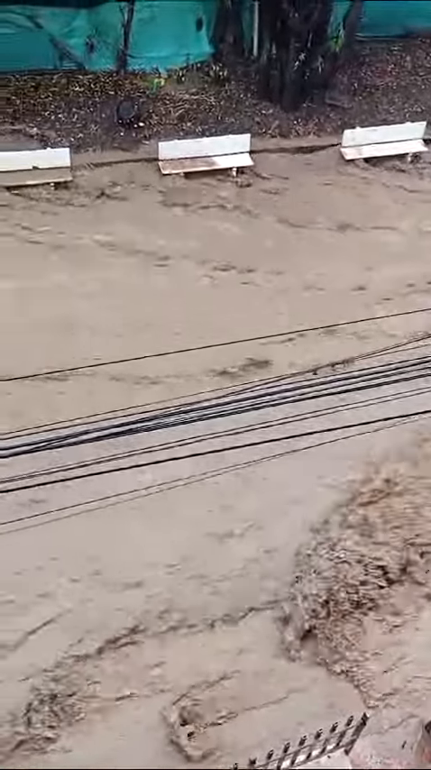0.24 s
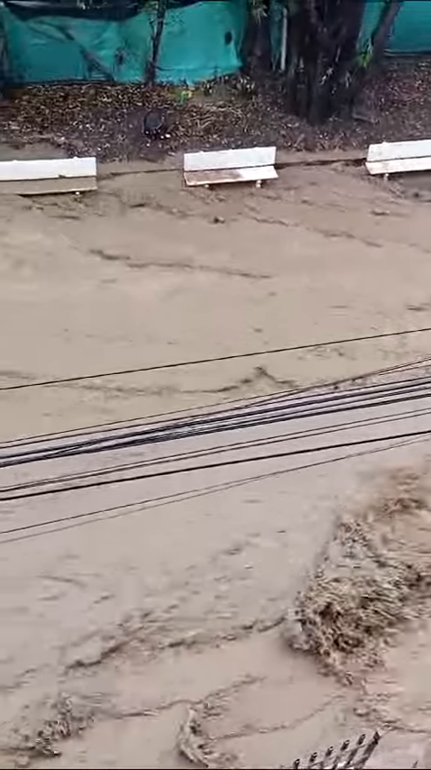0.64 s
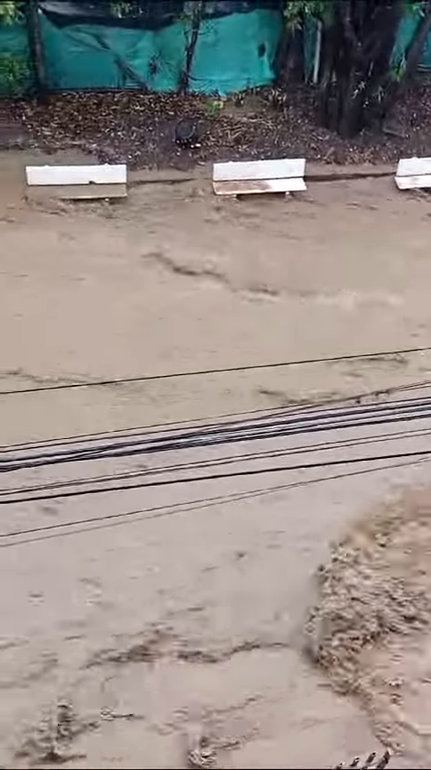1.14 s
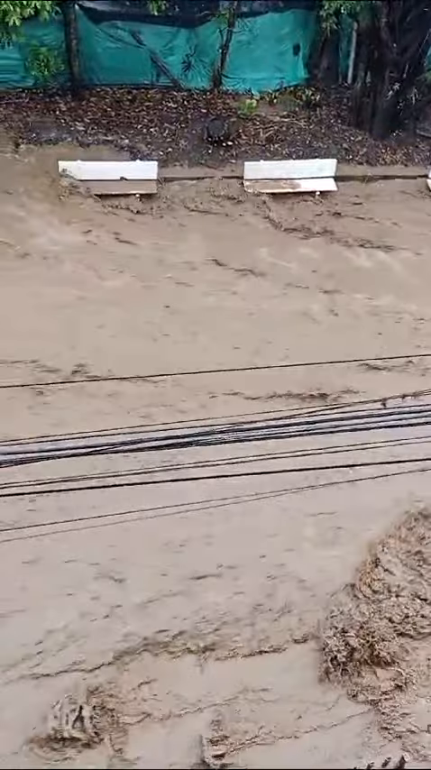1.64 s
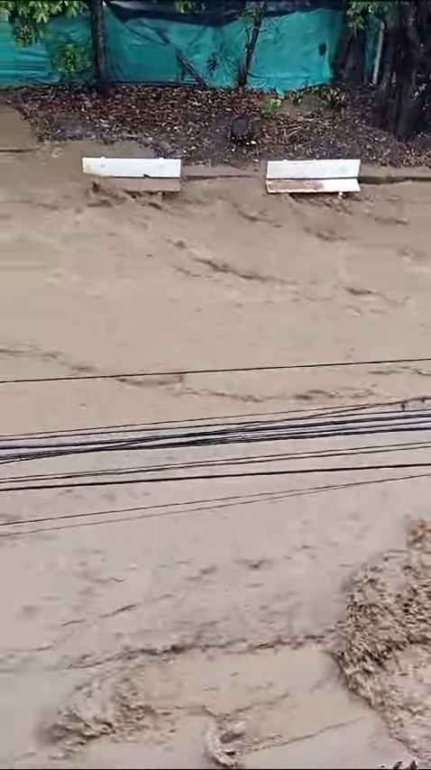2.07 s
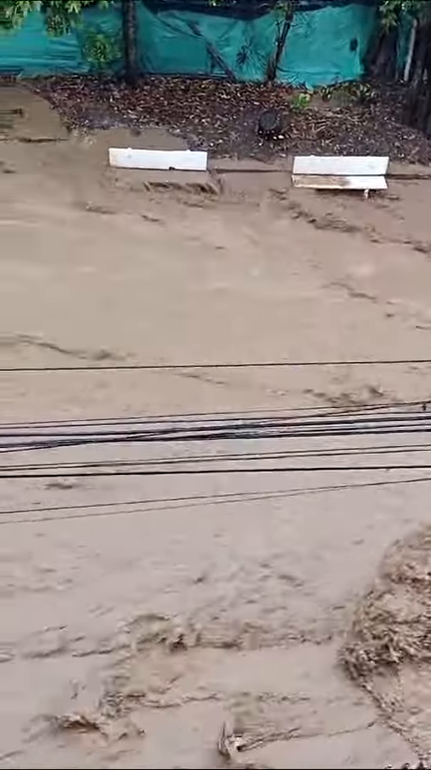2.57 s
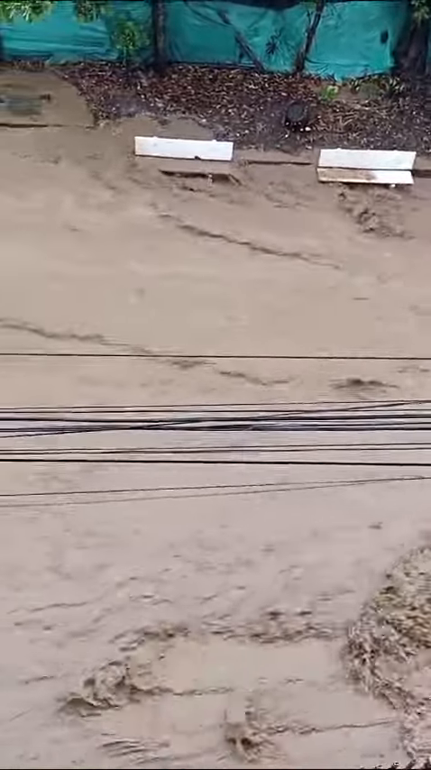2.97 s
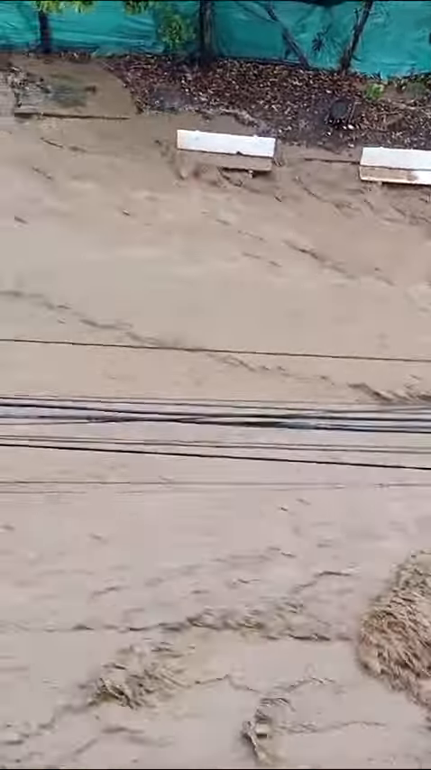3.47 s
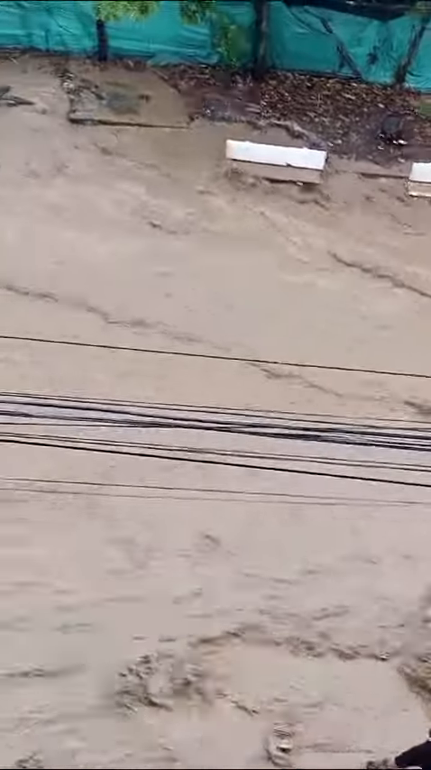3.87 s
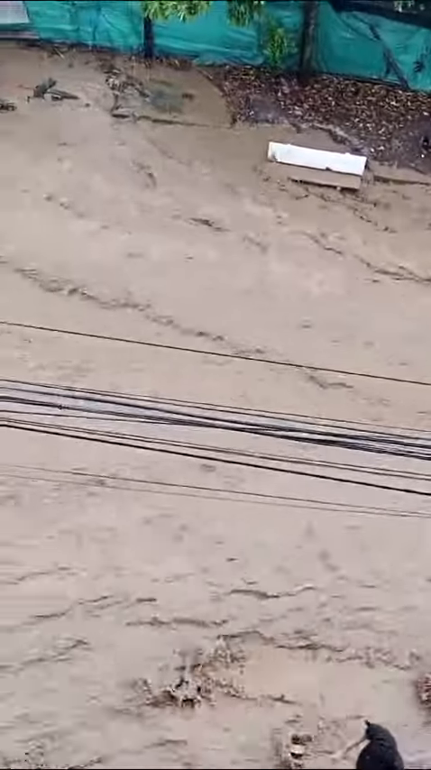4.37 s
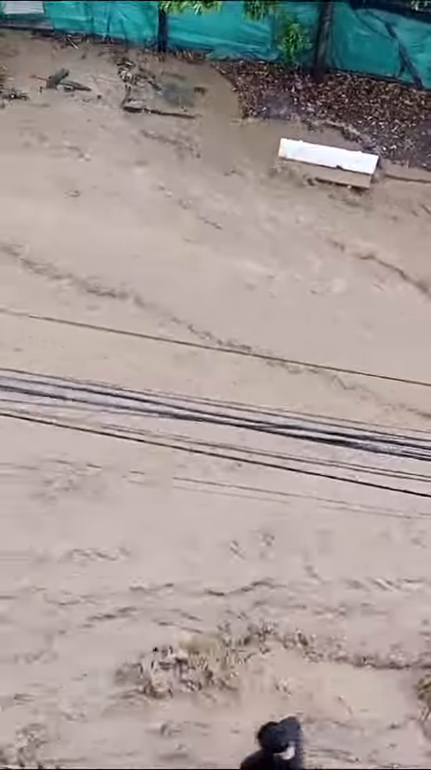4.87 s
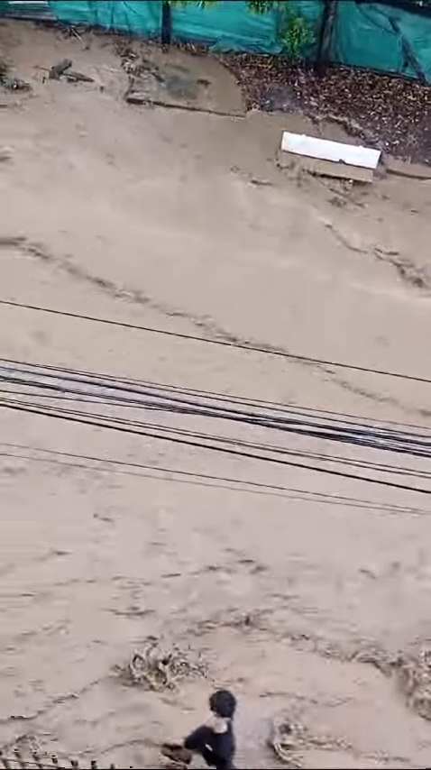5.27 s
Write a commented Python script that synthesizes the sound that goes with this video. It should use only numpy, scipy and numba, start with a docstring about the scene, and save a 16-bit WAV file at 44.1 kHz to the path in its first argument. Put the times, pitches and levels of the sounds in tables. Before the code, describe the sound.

A continuous dense rush of fast floodwater heard from above, with low throbbing churn, hissing spray, short bubbling gurgles and soft wind bumps.

```python
"""Floodwater in a city street

Muddy floodwater races by, heard from an upper floor through a hand-held phone.
Four swarms of dying sines with rising pitch, each blurred with noise, give churn, rush, splash and spray.
Single gliding tones gurgle above them; coloured noise makes a light wind with low thumps.
The phone loses a narrow band of the treble and cuts the top.
"""
import sys
import numpy as np
from scipy import signal
from scipy.fft import rfft, irfft
from scipy.io import wavfile
from scipy.ndimage import uniform_filter1d
from numba import njit

SR = 44100
rng = np.random.default_rng(int(sys.argv[2]) if len(sys.argv) > 2 else 0)


def bounce(signal):
    """Save signal as a 16-bit WAV file at the path given by the first command-line argument."""
    frames = np.transpose(np.atleast_2d(signal))
    limited = np.clip(frames, -1, 1)
    pcm = np.round(limited * 32767).astype(np.int16)
    wavfile.write(sys.argv[1], SR, pcm)


N = 242991
T = np.arange(N) / SR
FREQS_HZ = np.maximum(np.fft.rfftfreq(N, 1 / SR), 1)


def undb(db):
    """Decibels to gain."""
    return 10 ** (np.asarray(db) / 20)


def unit(x):
    """The same sound at rms 1."""
    return x / np.sqrt(np.mean(x ** 2))


def curve(table):
    """A (time_s, level_db) table joined by straight lines."""
    time_s, level_db = np.transpose(table)
    return np.interp(T, time_s, level_db)


def colour(x, points):
    """Shape a sound by a (freq_hz, level_db) spectrum that falls away beyond its ends; rms 1."""
    hz, db = np.transpose(points)
    skirts = np.minimum(1, np.minimum(FREQS_HZ / hz[0], hz[-1] / FREQS_HZ)) ** 2
    gain = undb(np.interp(np.log(FREQS_HZ), np.log(hz), db))
    return unit(irfft(rfft(x) * skirts * gain, N))


def band(x, hz, width):
    """The part of a sound around one frequency; width in log frequency."""
    return irfft(rfft(x) * np.exp(-(np.log(FREQS_HZ / hz) / width) ** 2), N)


def band_gain(x, hz, width, gain):
    """Apply a gain to the band around one frequency."""
    return x + band(x, hz, width) * (gain - 1)


def walk(rate_hz):
    """Random levels joined by ramps, rate_hz levels per second; rms near 1."""
    hold = int(SR / rate_hz)
    steps = np.repeat(rng.standard_normal(N // hold + 1), hold)
    return unit(uniform_filter1d(steps, hold)[:N])


def flutter(x, hz, width, swing_db, rate_hz):
    """One band of a sound comes and goes at random."""
    return band_gain(x, hz, width, unit(undb(swing_db * walk(rate_hz))))


def swell(s, half_s, order=2):
    """A smooth rise and fall, top 1; a higher order holds longer and has steeper sides."""
    return np.exp(-.5 * ((T - s) / half_s) ** order)


@njit
def ring(starts, hz, cycles, sizes, glide):
    """Each bubble is a dying sine whose pitch climbs as it nears the surface."""
    out = np.zeros(N)
    for k in range(len(starts)):
        life = cycles[k] * SR / hz[k]  # samples, to -60 dB
        z = sizes[k] + 0j
        turn = np.exp((2j * np.pi * cycles[k] - np.log(1000)) / life)
        bend = np.exp(2j * np.pi * hz[k] / SR * glide / life)
        for i in range(starts[k], min(N, starts[k] + int(life))):
            z *= turn
            turn *= bend
            out[i] += z.imag
    return out


def bubbles(low_hz, high_hz, cycles, spread_db, glide, count):
    """A swarm of bubbles of all sizes, a few louder than the rest; even in colour, rms 1."""
    when, pitch, life, size = rng.random((count, 4)).T
    hz = low_hz * (high_hz / low_hz) ** pitch
    sizes = hz * undb(-spread_db * np.log(.02 + .98 * size))
    starts = (when * N).astype(np.int64)
    return unit(ring(starts, hz, cycles * (.5 + life), sizes, float(glide)))


def water(swarm, points, blur_db, surge_db, surge_hz):
    """Near bubbles stand out of a noise blur of countless far ones; the whole patch surges."""
    blur = undb(blur_db) * rng.standard_normal(N)
    return colour(swarm + blur, points) * undb(surge_db * walk(surge_hz))


def churn(flow_db, breaking_db):
    """Standing waves fold over and throb as clouds of trapped air."""
    # spectrum of the clouds, level per Hz: freq_hz, level_db
    churn_colour = [(60, -41), (90, -35), (120, -21.5), (150, -15), (205, -6), (245, -3), (290, 0.5),
                    (335, -1), (410, 1), (520, -6), (700, -16), (1200, -41)]
    clouds = bubbles(low_hz=139.2, high_hz=763, cycles=21, spread_db=2.5, glide=0.039, count=4400)
    level_db = -33.5 + 0.59 * flow_db + breaking_db
    out = water(clouds, churn_colour, blur_db=3.5, surge_db=0.13, surge_hz=12) * undb(level_db)
    # the largest clouds of air come and go
    return flutter(slumps(out), hz=141, width=0.63, swing_db=4.0, rate_hz=14)


def rush(flow_db, breaking_db):
    """Smaller bubbles babble in the wash, in full step with the current."""
    # spectrum of the babble, level per Hz: freq_hz, level_db
    rush_colour = [(200, -32), (420, -2.5), (600, 1), (700, -1), (800, 0.5), (950, .5), (1150, -3.5),
                   (1400, -10.5), (2000, -42), (4000, -43)]
    babble = bubbles(low_hz=401.7, high_hz=1699.4, cycles=96, spread_db=1.0, glide=0.051, count=3000)
    level_db = -31.5 + flow_db + 0.13 * breaking_db
    return water(babble, rush_colour, blur_db=12.0, surge_db=-0.4, surge_hz=13) * undb(level_db)


def splash(flow_db, breaking_db, treble_db):
    """Small bubbles ring in the splashes; the band beside the treble gap wavers."""
    # spectrum of the splashes, level per Hz: freq_hz, level_db
    splash_colour = [(700, 3), (1200, 0.5), (1550, 1.1), (1850, 1), (2200, 0.1), (2900, -2.5), (3600, -7.5),
                     (4100, -13.5), (5000, -26), (7000, -48)]
    # level around 4.2 kHz, as the lower edge of the treble gap shifts: time_s, level_db
    gap_edge = [(0, -1), (.9, 0), (1.5, -3), (2.45, 3), (2.9, 0), (3.45, 3), (3.9, 2), (4.35, -4), (4.8, 0),
                (5.12, -3), (5.51, 1)]
    drops = bubbles(low_hz=1095.0, high_hz=4565, cycles=96, spread_db=1.0, glide=0.084, count=10000)
    level_db = -33.5 + 0.18 * flow_db + 0.35 * breaking_db + 0.54 * treble_db
    out = water(drops, splash_colour, blur_db=11.5, surge_db=0.5, surge_hz=22) * undb(level_db)
    out = band_gain(out, hz=4200, width=0.11, gain=undb(curve(gap_edge)))
    return flutter(out, hz=4400, width=0.1, swing_db=4.5, rate_hz=20)


def spray(flow_db, treble_db):
    """The finest bubbles fizz and hiss on top."""
    # spectrum of the fizz, level per Hz: freq_hz, level_db
    spray_colour = [(3500, -10), (5400, -9), (6000, -8), (6600, -1.5), (7500, 0), (8700, -0.5),
                    (9350, -10.5), (9900, -10), (10800, -11.5), (11400, -16.5), (12200, -12.5),
                    (13000, -11.5), (13800, -19.5), (15300, -12.5)]
    # level of the finest hiss, relative to the rest: time_s, level_db
    mist = [(0, -2), (.7, .5), (1.05, -1.5), (2, -1.5), (3.5, 1.5), (4.4, -1.5), (4.8, 1.5), (5.3, -2.5)]
    fizz = bubbles(low_hz=4340, high_hz=16000, cycles=13.5, spread_db=0.5, glide=0.055, count=50000)
    level_db = -39 + 0.36 * flow_db + treble_db
    out = water(fizz, spray_colour, blur_db=4.0, surge_db=0.4, surge_hz=26) * undb(level_db)
    out = band_gain(out, hz=14000, width=0.45, gain=undb(curve(mist)))
    return flutter(out, hz=12500, width=0.25, swing_db=-0.1, rate_hz=9.8)


def torrent():
    """Four sizes of trapped air, all driven by one current."""
    # strength of the current: time_s, level_db
    flow = [(0, 2), (.7, -1.5), (1.05, 1), (1.85, -1.3), (2.2, 0.7), (3.3, 0.75), (3.8, -1.2), (4.25, 0.5),
            (4.7, 2), (5.51, 1)]
    # treble level, falling as the phone turns from the big standing wave: time_s, level_db
    treble = [(0, 0.3), (.84, -0.4), (1.02, 1), (1.4, 0), (1.7, 1.5), (2.15, 0.5), (2.6, 0.3), (3.5, -1.5),
              (4.0, -2.0), (4.42, -4), (4.8, -3), (5.51, -2.5)]
    # waves that fold over and change the churn level: centre_s, half_length_s, change_db
    breakers = [(0.21, 0.017, 4.5), (0.775, 0.15, 3.5), (1.184, .025, 0), (1.39, 0.025, 2.5),
                (1.687, .019, 3), (2.204, .03, 1.5), (2.46, 0.045, 1.5), (2.878, .025, 0), (3.45, 0.1, 0.5),
                (4.44, .022, -0.5), (4.59, 0.023, 2), (4.733, 0.19, 3), (5.118, 0.017, 1), (5.377, 0.06, 0)]
    flow_db, treble_db = curve(flow), curve(treble)
    breaking_db = sum(db * swell(s, half_s) for s, half_s, db in breakers)
    low = churn(flow_db, breaking_db) + rush(flow_db, breaking_db)
    return low + splash(flow_db, breaking_db, treble_db) + spray(flow_db, treble_db)


def wind():
    """Gusts rise, hold and die away over a faint breeze; eddies hit the microphone as low thumps."""
    # spectrum of the wind, level per Hz: freq_hz, level_db
    wind_colour = [(15, -18), (40, -20), (75, -7), (130, 1), (200, -3.5), (500, -43)]
    # gusts over the microphone: start_s, end_s, level_db
    gusts = [(.26, 0.78, -57), (3.33, 3.6, -60), (4.5, 4.777, -48.5), (5.06, 5.25, -53)]
    # single puffs: centre_s, centre_hz, level_db
    puffs = [(.255, 110, -48), (.48, 65, -51), (.765, 85, -40), (1.144, 65, -53), (1.68, 60, -61),
             (3.39, 115, -51), (3.6, 111, -43.5), (3.772, 116, -47), (4.16, 115, -45.5), (4.305, 117, -36),
             (4.6, 90, -49), (4.685, 121, -40), (4.86, 111, -43.5)]
    attack_s, release_s, breeze_db = 0.05, 0.056, -61
    force = undb(breeze_db)
    for start_s, end_s, db in gusts:
        rise = np.minimum(T - start_s, 0) / attack_s
        fall = np.maximum(T - end_s, 0) / release_s
        force = force + undb(db) * np.exp(rise - fall)
    out = colour(rng.standard_normal(N), wind_colour) * force * undb(2.2 * walk(14))
    eddies = rng.standard_normal(N)
    for s, hz, db in puffs:
        thump = band(eddies, hz, width=0.61)
        shape = swell(s, half_s=0.023)
        thump_rms = np.sqrt(np.average(thump ** 2, weights=shape ** 2))
        out = out + undb(db) * shape * thump / thump_rms
    return out


def dips(x):
    """One band of the roar drops away for a moment and comes back quickly."""
    # brief dips: centre_s, half_length_s, centre_hz, depth (0-1)
    dip_table = [(.07, 0.09, 162, 0.96), (1.119, 0.029, 296, 0.8), (1.53, .028, 190, 0.7),
                 (1.86, 0.035, 165, 0.6), (2.385, 0.018, 210, 0.6), (2.803, 0.037, 170, 0.8),
                 (3.05, .02, 300, 0.8), (3.294, .02, 160, .5), (3.983, 0.027, 160, 0.7),
                 (4.228, .022, 308, .5), (4.362, 0.035, 850, 0.5), (4.372, 0.029, 200, 0.55),
                 (4.518, .02, 180, 0.4), (5.179, 0.023, 220, 0.65)]
    lost = 0
    for s, half_s, hz, depth in dip_table:
        lost = lost + min(depth, 1) * swell(s, half_s, order=4) * band(x, hz, width=0.57)
    return x - lost


def slumps(x):
    """Falling masses of water trap larger clouds of air, so the churn reaches further down."""
    # heavy slumps: centre_s, half_length_s, bass_rise_db
    slump_table = [(.31, 0.043, 11), (.54, .025, 0), (1.0, .03, 8), (1.76, .025, 7), (1.977, .03, 8),
                   (2.32, 0.036, 14), (2.522, 0.03, 15), (2.735, 0.021, 11), (3.467, .03, 7),
                   (3.65, .03, 10), (3.91, 0.028, 11), (4.125, 0.067, 13), (4.588, 0.025, 8),
                   (4.97, .04, 4)]
    rise_db = sum(db * swell(s, half_s) for s, half_s, db in slump_table)
    return band_gain(x, hz=118.5, width=0.43, gain=undb(rise_db))


def gurgles():
    """Large pockets of air ring for a moment, their pitch unsteady and climbing."""
    # air pockets: centre_s, pitch_hz, level_db
    gurgle_table = [(1.185, 433, -40), (1.681, 302, -34), (1.968, 1205, -36), (2.113, 598, -29),
                    (2.203, 1500, -36), (2.244, 384, -38), (2.328, 720, -32), (2.606, 618, -34),
                    (2.763, 624, -36), (2.943, 1213, -31), (2.949, 607, -29), (3.004, 383, -29),
                    (3.85, 400, -32.5), (4.435, 261, -29.5), (4.504, 944, -32), (4.595, 283, -30),
                    (4.778, 345, -36), (5.433, 498, -29.5)]
    half_s, climb = 0.014, 0.02  # climb: share of the pitch, either side of the centre
    wobble_hz = 20.05 * walk(110)
    out = 0
    for s, hz, db in gurgle_table:
        pitch_hz = hz * (1 + climb * np.tanh((T - s) / half_s)) + wobble_hz
        tone = np.sqrt(2) * np.sin(2 * np.pi * np.cumsum(pitch_hz) / SR)
        out = out + undb(db) * swell(s, half_s) * tone
    return out


def ledge(x, from_s, fade_s, lag_s, share, dull_hz):
    """The phone moves close to a hard surface, whose quick dull echo hollows the roar a little."""
    delay = np.exp(-2j * np.pi * FREQS_HZ * lag_s)
    echo = irfft(rfft(x) * delay / (1 + (FREQS_HZ / dull_hz) ** 4), N)
    return x + share * np.clip((T - from_s) / fade_s, 0, 1) * echo


def scene():
    """The flood below and the breeze at the microphone."""
    flood = dips(torrent()) + gurgles()
    flood = ledge(flood, from_s=3.5, fade_s=0.93, lag_s=0.00081, share=0.16, dull_hz=3200)
    return (flood + wind())[None, :]


def record(dry):
    """The phone loses a narrow band of the treble and cuts the top."""
    # gap in the phone's treble: freq_hz, gain_db
    notch = [(4000, 0), (4250, -5), (4550, -17), (4700, -36), (4930, -40), (5060, -23), (5330, 0)]
    heard = irfft(rfft(dry) * undb(np.interp(FREQS_HZ, *np.transpose(notch))), N)
    top_cut = signal.ellip(14, .1, 90, 15480, fs=SR, output="sos")  # ripple dB, stop dB, edge Hz
    return signal.sosfilt(top_cut, heard)


dry = scene()
out = record(dry)
bounce(out)
```